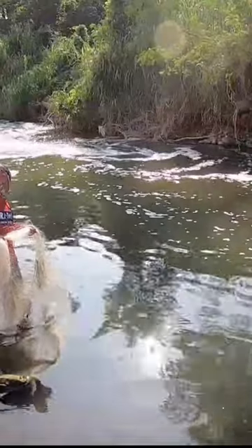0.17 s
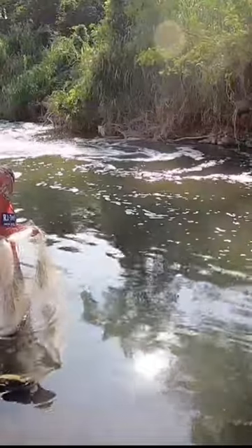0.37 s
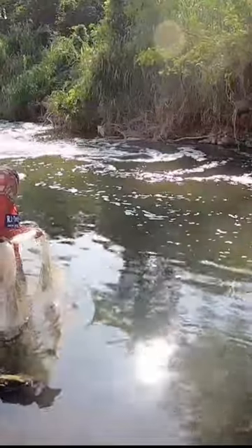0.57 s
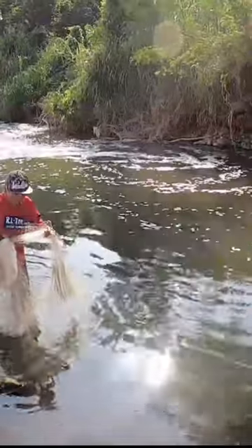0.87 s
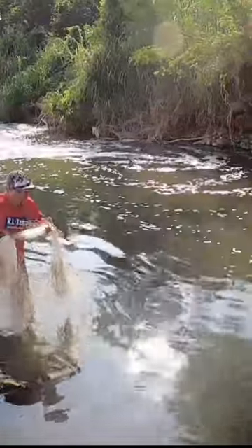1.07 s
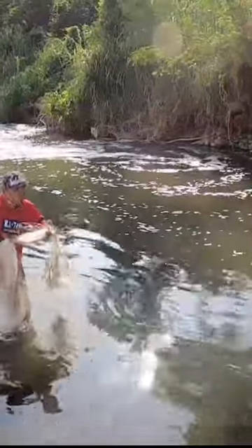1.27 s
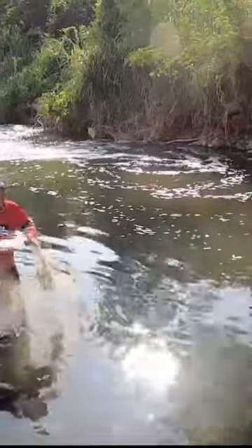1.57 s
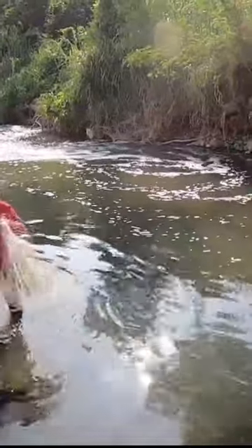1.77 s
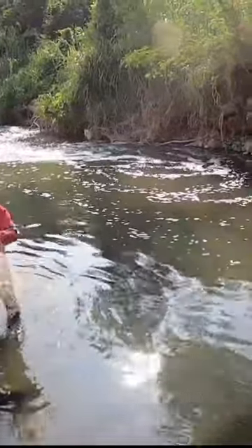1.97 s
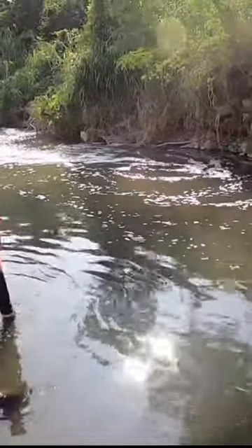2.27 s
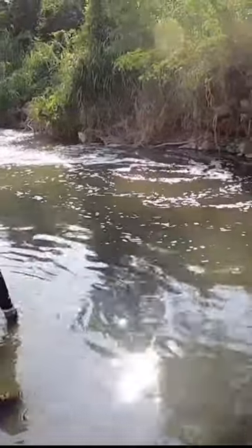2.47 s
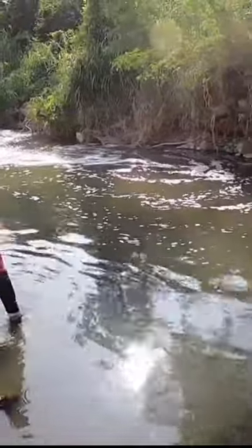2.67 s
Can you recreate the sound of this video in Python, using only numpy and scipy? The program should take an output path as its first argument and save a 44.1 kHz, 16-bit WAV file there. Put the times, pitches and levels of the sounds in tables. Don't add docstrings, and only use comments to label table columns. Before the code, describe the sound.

Steady river rush outdoors, with a low engine drone easing off, small wading splashes and bird whistles

```python
import sys
import numpy as np
from scipy import signal
from scipy.fft import rfft, irfft, next_fast_len
from scipy.io import wavfile
from scipy.ndimage import uniform_filter1d, map_coordinates

SR = 44100
rng = np.random.default_rng(int(sys.argv[2]) if len(sys.argv) > 2 else 0)


def voltage_ratio(level):
    return 10 ** (np.asarray(level, float) / 20)


def wav_record(signal):
    frames = np.transpose(np.atleast_2d(signal))
    bounded = np.clip(frames, -1, 1)
    quanta = np.round(bounded * 32767).astype(np.int16)
    wavfile.write(sys.argv[1], SR, quanta)


N = 124803
TIME = np.arange(N) / SR


def unit(x):
    return x / np.sqrt(np.mean(x ** 2) + 1e-20)


def along(points, hz):
    f, v = np.transpose(points)
    return np.interp(np.log(hz + 1), np.log(f + 1), v)


def curves(rows):
    s, *cols = np.transpose(rows)
    return [np.interp(TIME, s, c) for c in cols]


def wobble(rate):
    knots = rng.standard_normal(int(N * rate / SR) + 4)
    return map_coordinates(knots, [np.arange(N) * rate / SR])


def filtered(x, response):
    m = next_fast_len(N + SR // 2)
    mirrored_end = x[..., :-2049:-1] * np.linspace(1, 0, 2048)
    spectrum = rfft(np.concatenate([x, mirrored_end], axis=-1), m)
    return irfft(spectrum * response(np.fft.rfftfreq(m, 1 / SR)), m)[..., :N]


def shaped_noise(shape, points):
    return filtered(rng.standard_normal(shape), lambda hz: voltage_ratio(along(points, hz)))


def ports(pair):
    # pitch_hz, likeness (1 = the same)
    alike = [(150, 1), (540, 0.92), (1100, 0.85), (2500, 0.83), (4900, 0.74), (9000, 0.25), (14700, 0.24)]
    # pitch_hz, left_over_right_db
    lean = [(100, .5), (400, 1.5), (1200, 2), (3300, 3.5), (5400, 2), (7500, -3), (14700, -3)]
    # pitch_hz, lead_radians
    lead = [(1500, -.1), (2330, -1), (2900, -.4), (4740, -.1), (6370, -.9), (7840, -.7), (9040, 1),
            (10600, 0)]

    def share(hz):
        angle = np.arccos(np.clip(along(alike, hz), -1, 1)) / 2
        return np.array([np.cos(angle), np.sin(angle)])

    def tilt(hz):
        left = voltage_ratio(along(lean, hz) / 2) * np.exp(.5j * along(lead, hz))
        return np.array([left, 1 / left])

    common, separate = filtered(pair, share)
    return filtered(np.array([common + separate, common - separate]), tilt)


def glides(rows, lift_db):
    out = np.zeros(N)
    for s, length, start_hz, end_hz, db in rows:
        u = np.linspace(0, 1, int(length * SR))
        turns = np.cumsum(start_hz + (end_hz - start_hz) * u) / SR
        arch = voltage_ratio(db + lift_db) * np.sin(np.pi * u) ** 0.76
        out[round(s * SR):][:len(u)] += arch * np.sin(2 * np.pi * turns)
    return out


def patchy(patchy_db):
    z = signal.stft(rng.standard_normal((2, N)), nperseg=512)[2]
    field = rng.standard_normal(z.shape[1:])
    field = uniform_filter1d(field, size=8, axis=0)
    field = uniform_filter1d(field, size=8, axis=1)
    depth_db = patchy_db * np.linspace(1, 3, len(field))[:, None]
    return signal.istft(z * voltage_ratio(depth_db * unit(field)), nperseg=512)[1][:, :N]


def bubbles():
    bubbles_per_s, middle_hz, size_db = 2500, 2800, 2
    draw = rng.random((int(bubbles_per_s * N / SR), 4))
    hz = np.clip(middle_hz * np.exp(2.4 * (draw[:, 1:2] + draw[:, 2:3] - 1)), 250, 13000)
    t = np.arange(512) / SR
    cycles = hz * t
    strength = voltage_ratio(-size_db * np.log(draw[:, 3:] + 1e-9))
    envelope = np.exp(-cycles / 3) * (1 - np.exp(-cycles))
    tones = strength * envelope * np.sin(2 * np.pi * cycles * (1 + .02 * cycles))
    at = (draw[:, :1] * N).astype(int) + np.arange(len(t))
    return unit(np.bincount(at.ravel(), tones.ravel(), N + len(t))[:N])


def river():
    # time_s, level_db
    flow = [(0.3, -40.5), (1.08, -41), (1.32, -42), (1.39, -41.5), (2.81, -41), (2.83, -40.5)]
    # pitch_hz, level_db_per_hz
    riffle = [(90, -20), (150, 3), (350, -14.5), (1070, -10), (2800, -20), (6000, -30.5), (12600, -43.5),
              (15300, -48)]
    # pitch_hz, reflected_share
    mirror = [(300, 0.2), (900, 0.47), (1500, 0.13), (3000, 0.025)]
    mirror_delay_s, bubble_db = 0.001823, -11

    def path(hz):
        reflection = along(mirror, hz) * np.exp(-2j * np.pi * hz * mirror_delay_s)
        return voltage_ratio(along(riffle, hz)) * (1 + reflection)

    rush = unit(patchy(patchy_db=0.5))
    rush[0] += voltage_ratio(bubble_db) * bubbles()
    level_db, = curves(flow)
    unsteady_db = 0.3 * wobble(4.5) + 0.5 * wobble(13)
    return voltage_ratio(level_db + unsteady_db) * unit(ports(filtered(rush, path)))


def engine():
    # time_s, firing_rate_hz, level_db
    running = [(.1, 57.57, -42.5), (.45, 56.88, -36.5), (.7, 56.45, -38.5), (.88, 55.74, -37.5),
               (.96, 55, -37.5), (1.03, 51.24, -44.5), (1.15, 50.25, -41), (1.5, 49.4, -42.5),
               (2.05, 48.47, -41.5), (2.4, 49.15, -46), (2.83, 49.3, -44)]
    # multiple_of_firing_rate, level_db
    exhaust = [(1, -3), (2, 1), (3, -6), (4, -10), (5, -23), (6, -27)]
    # time_s, level_db
    rumble = [(.3, -51), (.4, -33.5), (.55, -45.5), (.75, -37), (.96, -41), (1.04, -46), (1.12, -41.5),
              (1.4, -35.5), (1.54, -42), (1.66, -35), (1.92, -41), (2.04, -32), (2.14, -42.5), (2.45, -38),
              (2.67, -38), (2.8, -42)]
    # pitch_hz, level_db_per_hz
    far_road = [(11, -25), (20, -1), (42, 0.5), (68, 0.5), (85, -6.5), (130, -16), (300, -120)]
    # pitch_hz, level_db_per_hz
    chuff_colour = [(60, -120), (95, 10), (160, -5.5), (230, -1), (340, -10), (500, -39), (900, -120)]
    lift_off_s, lift_off_length_s, lift_off_db, puff_db = 0.943, 0.04, 12, -50.5

    hz, level_db = curves(running)
    rumble_db, = curves(rumble)
    turns = np.cumsum(hz * (1 + 0.0036 * wobble(8.8))) / SR
    drone = np.zeros(N)
    for order, db in exhaust:
        flutter = voltage_ratio(db + 1.87 * wobble(7.09))
        drone += flutter * np.sin(2 * np.pi * (order * turns + .05 * wobble(12)))
    road = unit(shaped_noise(N, far_road))
    swell_db = lift_off_db * np.exp(-((TIME - lift_off_s) / lift_off_length_s) ** 2)
    chuff = unit(shaped_noise(N, chuff_colour)) * voltage_ratio(swell_db)
    mix = voltage_ratio(level_db) * unit(drone) + voltage_ratio(rumble_db) * road + voltage_ratio(puff_db) * chuff
    return mix * voltage_ratio([[.3], [-.3]])


def breeze():
    # pitch_hz, level_db_per_hz
    wind = [(9, -20), (20, 0), (50, -2), (80, -10), (200, -17), (350, -28), (660, -120)]
    puffs = voltage_ratio(1.9 * np.array([wobble(8.8), wobble(7.0)]))
    return voltage_ratio(-51.5) * unit(puffs * shaped_noise((2, N), wind)) * voltage_ratio([[2.5], [-2.5]])


def wading():
    # middle_s, half_length_s, level_db
    splashes = [
        (0.26, .03, -53),
        (0.816, 0.0095, -63),
        (1.076, .03, -56),
        (1.385, 0.029, -57),
        (1.62, .03, -58),
        (1.792, 0.024, -56.5),
        (1.9, .02, -54.5),
        (2.052, 0.018, -54),
        (2.1, 0.013, -55),
        (2.318, 0.027, -57),
    ]
    # pitch_hz, level_db_per_hz
    spray_colour = [(500, -120), (1200, -6), (2500, 3.5), (5000, -6.5), (9000, -15), (13000, -28),
                    (15300, -34)]
    # start_s, length_s, start_hz, end_hz, level_db
    gurgles = [
        (1.065, .025, 1000, 1150, -44),
        (1.745, .035, 1170, 930, -43),
        (2.035, .03, 1200, 980, -43),
        (2.17, .02, 1250, 1350, -45),
        (2.19, .03, 520, 600, -42),
        (2.23, .025, 450, 520, -42),
        (1.5, .06, 400, 450, -47),
        (.265, .025, 980, 1050, -44),
        (2.055, .012, 1650, 1550, -47),
    ]
    bursts = sum(voltage_ratio(db) * np.exp(-((TIME - s) / half) ** 2) for s, half, db in splashes)
    grains = rng.standard_normal((2, N)) * voltage_ratio(3.8 * wobble(300))
    spray = unit(ports(filtered(grains, lambda hz: voltage_ratio(along(spray_colour, hz)))))
    gurgling = glides(gurgles, 0) * voltage_ratio(1.0 * wobble(70))
    return bursts * spray + gurgling * voltage_ratio([[1], [-1]])


def drips():
    # start_s, peak_db, pitch_hz
    drops = [
        (0.808, -54, 3340),
        (2.3731, -37, 4050),
    ]
    out = np.zeros(N)
    t = np.arange(SR // 50) / SR
    for s, db, hz in drops:
        out[round(s * SR):][:len(t)] += voltage_ratio(db - 60 * t / 0.0072) * np.sin(2 * np.pi * hz * t)
    return out * voltage_ratio([[1.5], [-1.5]])


def bird():
    # start_s, length_s, start_hz, end_hz, level_db
    chirps = [(1.062, 0.023, 1903, 1400, -50), (1.113, 0.019, 3050, 2260, -45),
              (1.385, 0.018, 2468, 1930, -48), (1.436, 0.017, 2170, 2030, -49),
              (1.627, 0.029, 3150, 2100, -44), (1.66, 0.027, 2900, 2250, -46.5),
              (1.69, .012, 2070, 1940, -50), (1.702, .044, 2620, 2130, -45.5), (1.79, .02, 2850, 2750, -54),
              (1.98, 0.014, 2490, 2200, -50), (1.997, 0.034, 2270, 1880, -49.5),
              (2.143, .016, 2000, 1800, -51), (2.172, 0.019, 2700, 2760, -54),
              (2.227, 0.019, 2700, 1850, -49), (2.258, .016, 2900, 2750, -52),
              (2.305, .025, 2800, 2800, -56), (2.315, .012, 3300, 3100, -54),
              (2.354, .012, 3300, 2950, -54)]
    bounce_s, bounce_share = .00284, .55
    echo_t60_s, echo_db = 0.25, -7
    song = glides(chirps, 1.5) * voltage_ratio(1.2 * wobble(90) + 1.5 * wobble(500))
    song = song + bounce_share * np.roll(song, round(bounce_s * SR))
    t = np.arange(SR // 2) / SR
    tail = rng.standard_normal((2, len(t))) * voltage_ratio(-60 * t / echo_t60_s)
    echo = signal.fftconvolve(song[None], tail / np.linalg.norm(tail[0]), axes=1)[:, :N]
    direct = np.array([voltage_ratio(0.7) * song, voltage_ratio(-1.3) * np.roll(song, shift=3)])
    return direct + voltage_ratio(echo_db) * echo


def scene():
    return river() + engine() + breeze() + wading() + drips() + bird()


def band_limit(x):
    return signal.sosfilt(signal.butter(12, 15150, fs=SR, output="sos"), x)


def record(dry):
    # time_s, level_db
    fade_in = [(.072, -80), (.088, -42.5), (.152, -30), (.162, -4.5), (.2, 0.5), (.25, -0.5), (.29, 4)]
    # pitch_hz, width_hz, share_lost
    port_dips = [(2626, 100, 0.27), (6740, 250, 0.25), (8620, 110, 0.45), (10900, 1400, 0.35)]

    def housing(f):
        dips = np.prod([1 - lost * np.exp(-((f - hz) / w) ** 2) for hz, w, lost in port_dips], axis=0)
        peak = 1 + .3 * np.exp(-((f - 2830) / 80) ** 2)
        shelf_db = -7 * np.clip((f - 12800) / 300 + .5, 0, 1)
        return dips * peak * voltage_ratio(shelf_db)

    fade_db, = curves(fade_in)
    x = filtered(dry, housing) * voltage_ratio(fade_db) * (TIME > fade_in[0][0])
    fade_out_s = .004
    x = x * np.clip((N - np.arange(N)) / (fade_out_s * SR), 0, 1)
    return band_limit(x)


dry = scene()
out = record(dry)
wav_record(out)
```